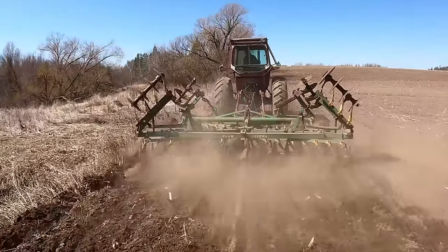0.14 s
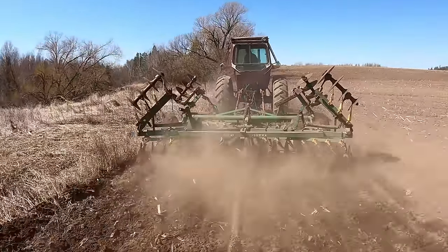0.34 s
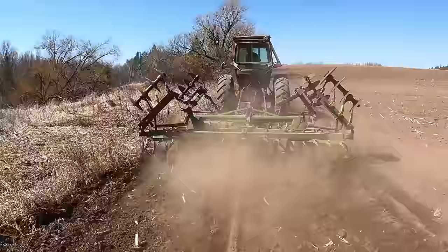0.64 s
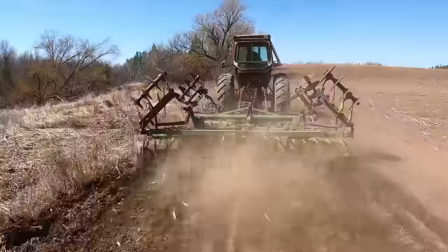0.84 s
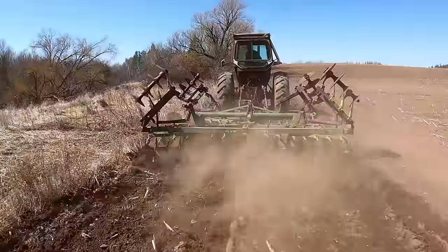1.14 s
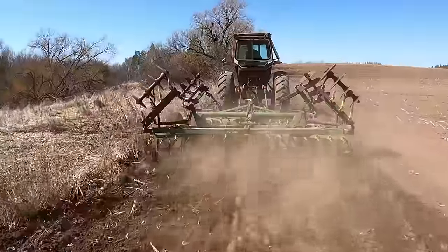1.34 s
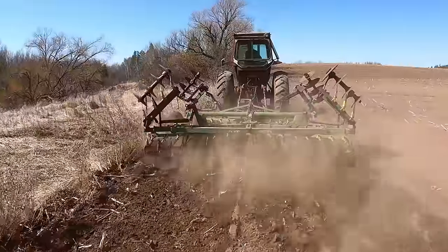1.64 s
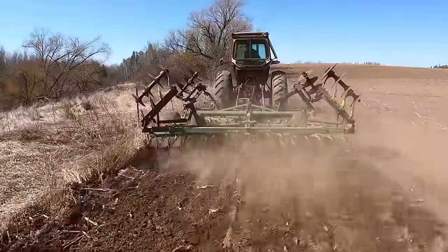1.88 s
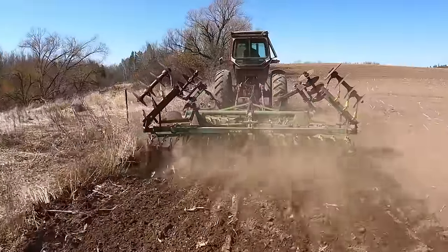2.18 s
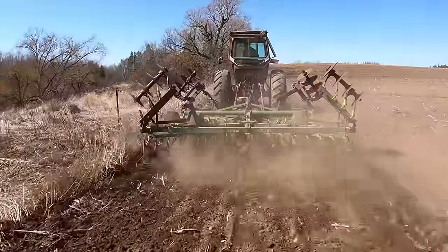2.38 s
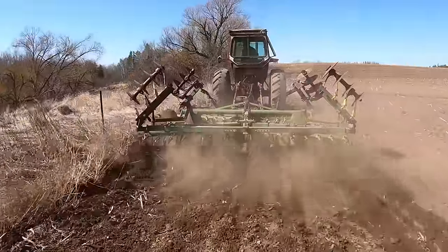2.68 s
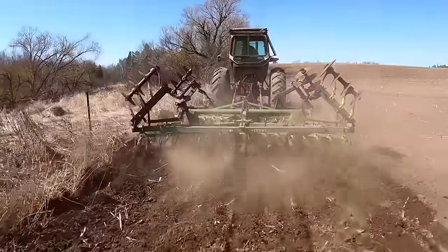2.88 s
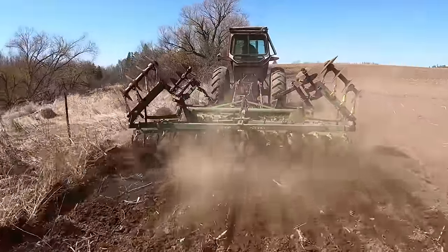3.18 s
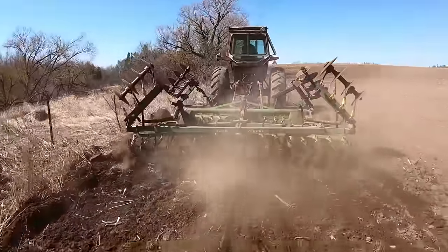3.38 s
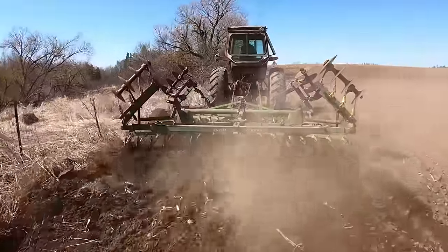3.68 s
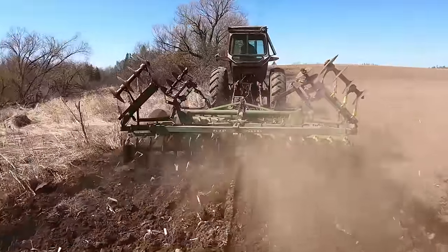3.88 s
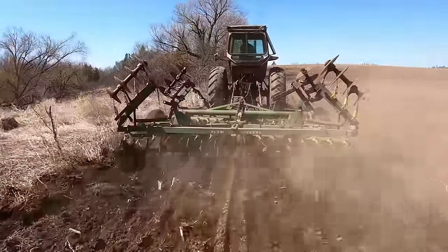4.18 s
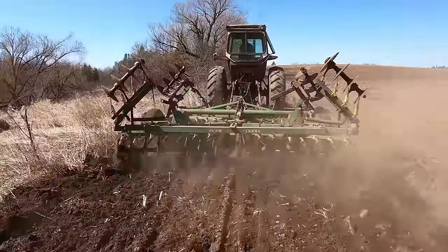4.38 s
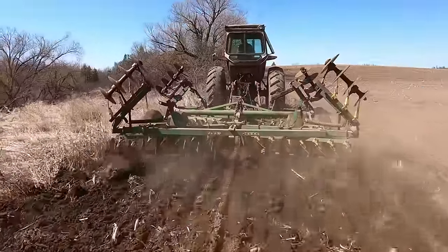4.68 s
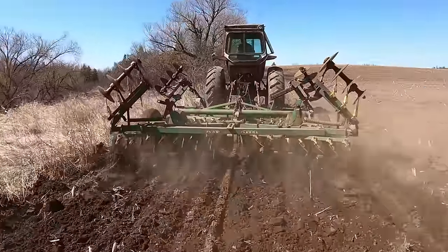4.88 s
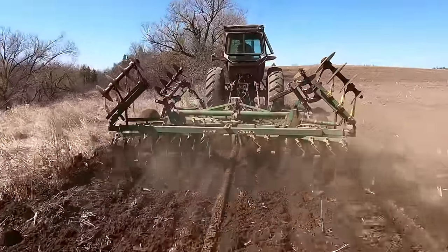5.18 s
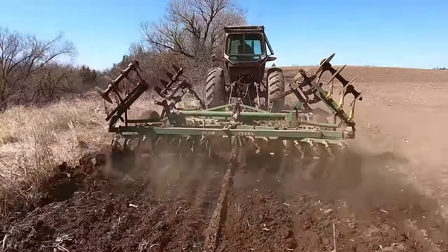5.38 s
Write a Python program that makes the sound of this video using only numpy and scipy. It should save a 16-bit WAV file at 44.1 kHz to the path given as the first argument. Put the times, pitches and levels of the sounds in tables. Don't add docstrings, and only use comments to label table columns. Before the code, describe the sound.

Continuous low engine boom and broad roar, heard in stereo from a vehicle trailing a tractor outdoors. Gritty soil crunch swells and falls in patches; dull knocks, bright stone pings and short rattling scrapes come irregularly. Squeaks cluster near half a second, two and a half and three and a half seconds. Clanks stop after about 3.6 seconds; late scrapes, sand spray and a short squeak end it as the harrow draws slightly away.

```python
import sys
import numpy as np
from scipy import signal
from scipy.fft import rfft, irfft, next_fast_len
from scipy.io import wavfile
from scipy.ndimage import uniform_filter1d

SR = 44100
rng = np.random.default_rng(int(sys.argv[2]) if len(sys.argv) > 2 else 0)


def log_audio(samples):
    frames = np.atleast_2d(samples).T
    limited = np.clip(frames, -1, 1)
    pcm = np.round(limited * 32767).astype(np.int16)
    wavfile.write(sys.argv[1], SR, pcm)


def voltage_ratio(level):
    return 10 ** (np.asarray(level, float) / 20)


N = 243873

# mode_hz, level_db, t60_s
DISC_MODES = [(575, 0.5, 0.035), (707, -8, 0.065), (981, -5, 0.18), (1200, -7, 0.017), (1452, -6.5, 0.069),
              (1600, -22, .06), (1753, -7, 0.19), (1930, -12, 0.72), (2060, -5.5, 0.12), (2350, -4.5, 0.03),
              (2490, -9.5, 0.12), (2870, -7, 0.11), (3180, -9.5, 0.04), (3450, -7, 0.056),
              (3600, -8.5, .08), (3910, -4, 0.072), (4020, -14, 0.063), (4350, -7.5, 0.12),
              (5150, -4, 0.066), (5450, -7, .08), (5840, -3, 0.083), (7000, 1, 0.052), (7530, -2.5, 0.071),
              (8800, -11, 0.093), (9900, -11, .1), (12064, -26, .1)]


def on_log(table, hz):
    f, v = np.transpose(table)
    return np.interp(np.log(np.maximum(hz, 1)), np.log(f), v)


def level(x, db):
    return x * voltage_ratio(db) / np.sqrt(np.mean(x ** 2))


def walk(rate_hz):
    k = int(SR / rate_hz)
    held = np.repeat(rng.standard_normal(N // k + 1), k)
    return 1.31 * uniform_filter1d(uniform_filter1d(held, k), k)[:N]


def colour(x, gain):
    m = next_fast_len(N)
    return irfft(rfft(x, m) * gain(np.arange(m // 2 + 1) * SR / m), m)[..., :N]


def bands(x, table, swell_db, flicker_db, rate_hz):
    swell = swell_db * walk(rate_hz / 3)
    out = 0
    for centre_hz in 30 * 2 ** np.arange(10):
        def band_gain(f):
            octaves = np.clip(np.log2((f + 1) / centre_hz), -1, 1)
            return voltage_ratio(on_log(table, f)) * np.cos(np.pi / 2 * octaves) ** 2
        out = out + colour(x, band_gain) * voltage_ratio(swell + flicker_db * walk(rate_hz))
    return out


def modes(hz, t60_s):
    t = np.arange(4096) / SR
    return np.exp(2j * np.pi * np.outer(hz, t) - np.log(1000) * t / np.reshape(t60_s, (-1, 1)))


def exhaust(turns, orders, wobble_turns, shimmer_db):
    wavering = turns + wobble_turns * walk(9.7)
    out = np.zeros(N)
    for order, db, sign in orders:
        out += sign * voltage_ratio(db + shimmer_db * walk(7.6)) * np.cos(2 * np.pi * order * wavering)
    return out


def tractor_exhaust(turns, t):
    # firing_multiple, level_re_boom_db, sign
    tractor_orders = [(4 / 6, -31, -1), (5 / 6, -23, -1), (1, 0, 1), (7 / 6, -23, -1), (1.797, -24, 1),
                      (2, -30, 1), (2.5, -32, 1), (17 / 6, -30, 1), (3, -22, 1), (4, -34, -1),
                      (4.29, -30, 1), (7.32, -35, 1), (9.32, -33, 1), (15.3, -34, 1)]
    boom_db, early_db, settle_s = -13, -1.5, 1.95
    return voltage_ratio(boom_db + early_db * np.exp(-(t / settle_s) ** 2)) * exhaust(turns, tractor_orders, .008, .4)


def quad_exhaust(turns):
    # harmonic, peak_db, sign
    quad_orders = [(2, -32, -1), (3, -38.5, 1), (4, -31, 1), (5, -27, 1), (6, -28, 1), (7, -27, 1),
                   (8, -30, 1), (9, -36, 1), (11, -49, 1), (12, -41, 1), (13, -48, 1), (15, -46, -1)]
    return voltage_ratio(.8) * exhaust(turns, quad_orders, .003, .6)


def roar(turns, quad_turns):
    # frequency_hz, density_db_per_hz
    roar_spectrum = [(12, -14), (30, -1), (50, -8), (100, -2), (130, -2), (160, -5.5), (220, -6.5),
                     (300, -5), (400, -11.5), (700, -10), (850, -13.5), (1400, -13), (2200, -19),
                     (4000, -33.5), (8000, -44), (13000, -63)]
    puff_db = 0.61 * np.cos(2 * np.pi * turns - 0.8) + 0.74 * np.cos(2 * np.pi * quad_turns)
    noise = bands(rng.standard_normal((2, N)), roar_spectrum, 1.0, 0.88, 9)
    return level(noise, -29.5) * voltage_ratio(puff_db)


def work(t):
    clods = [(0.0, 0.28, 4, 2), (.39, 0.034, 4.5, 3.5), (.54, 0.062, 8, 5.5), (.64, 0.82, 4, 1),
             (1.0, 0.054, -1, 1.5), (1.149, 0.14, 4, -1), (1.515, 0.023, 5, 1.5), (1.8, 0.088, 8, -6.5),
             (1.96, 0.64, 7, -2), (2.25, 0.078, 2.5, 5), (2.46, 0.074, 5, 5.5), (2.62, 0.4, 2.5, 1),
             (2.88, 0.11, 1.5, 3.5), (3.3, 0.068, 3, 0.5), (3.46, 0.065, 7.5, 0), (3.63, 0.19, 7, 1.5),
             (3.96, .05, 6, -7.5), (4.28, 0.1, 5, 1.5), (4.522, 0.45, 6.5, -1), (4.93, 0.092, 5.5, 0),
             (5.111, 0.11, 8.5, -2.5), (5.3, 0.18, 4.5, 1), (5.52, .05, 2.5, 7.5)]
    crunch_db, crunch_db_per_s, dust_db, attack_s = -35, -1.7, -14, 0.049
    start_s, release_s, crunch_rise_db, dust_rise_db = np.transpose(clods)
    u = t - start_s[:, None]
    swell = np.exp(-(u / np.where(u < 0, attack_s, release_s[:, None])) ** 2)
    return crunch_db + crunch_db_per_s * t + crunch_rise_db @ swell, dust_db + dust_rise_db @ swell


def soil(crunch_db, dust_db):
    # frequency_hz, density_db_per_hz
    soil_spectrum = [(500, -40), (1000, 2.5), (1600, -1), (3000, -2.5), (4000, -1.5), (5500, -7.5),
                     (7500, -12.5), (9000, -21), (12000, -28), (14000, -41)]
    burst_db = 0.89 * rng.exponential(size=N) + 0.6 * walk(45) + 1.64 * walk(150)
    grains = rng.standard_normal((2, N)) * voltage_ratio(burst_db)
    crunch = level(bands(grains, soil_spectrum, .01, 0.31, 24.96), 0)
    hz, _, t60_s = np.transpose(DISC_MODES)
    ring = modes(hz, t60_s).imag.sum(axis=0, keepdims=True)
    crunch = crunch + level(signal.fftconvolve(crunch, ring)[:, :N], -8)
    dust = colour(crunch, lambda f: np.clip(np.log2((f + 1) / 4500), 0, 1))
    return voltage_ratio(crunch_db - 2.5) * (crunch + dust * (voltage_ratio(dust_db + 14) - 1))


def blow_rows():
    # start_s, peak_db, low_ring_hz
    hub_knocks = [(0.015, -29, 1120), (0.0318, -12.5, 1550), (0.1984, -22, 1110), (0.2108, -19, 1970),
                  (0.5888, -14, 1313), (0.609, -13.5, 1930), (0.872, -14.5, 1390), (1.0888, -13, 2165),
                  (1.296, -20, 1430), (1.435, -18.5, 1500), (2.011, -19, 1590), (2.0751, -15, 2060),
                  (2.1105, -17, 1470), (2.206, -21, 1210), (2.44, -16, 1420), (2.627, -22, 1930),
                  (2.723, -16, 1400), (2.849, -18.5, 985), (3.108, -19, 1460), (3.1985, -19.5, 1106),
                  (3.463, -23.5, 1000), (3.6079, -22, 1010), (3.644, -17, 1220), (3.7796, -21, 990),
                  (3.7958, -16, 1980), (4.287, -18.5, 1190), (4.3063, -17, 1160), (4.4055, -17, 2210),
                  (4.6162, -19, 1550), (4.977, -18.5, 1930)]
    # start_s, peak_db, high_ring_hz, high_re_peak_db
    rim_pings = [(0.1077, -22, 2270, -9), (0.367, -21.5, 5150, 0.5), (.369, -24.5, 3920, -1),
                 (0.4136, -25.5, 2870, 3), (0.6574, -27, 6530, -8), (0.673, -22, 4280, -2.5),
                 (0.7445, -20, 2790, -8), (0.9282, -15.5, 2250, -7.5), (1.14, -29.5, 5000, 2.5),
                 (1.485, -22, 2540, -8.5), (1.7704, -20.5, 2620, -5), (1.8292, -24, 4060, -3),
                 (1.9335, -35, 2350, 8.5), (1.956, -26.5, 2410, 10), (2.2545, -21.5, 3910, -7),
                 (2.2713, -25, 2790, 2), (2.391, -30.5, 2900, 5), (2.4051, -27, 3950, 7.5),
                 (2.8296, -15.5, 2710, -12), (3.434, -23, 2590, -8), (3.566, -21, 3490, -4.5),
                 (3.6544, -16.5, 2730, -8), (3.6746, -14.5, 3710, -6.5), (3.69, -22, 3500, -5.5),
                 (3.946, -30, 4300, 1.5), (4.337, -25.5, 4520, 1)]
    # start_s, peak_db, low_ring_hz, high_ring_hz, high_re_peak_db
    disc_scrapes = [(0.306, -17.5, 1420, 2080, -2), (0.399, -11, 1600, 2490, -3.5),
                    (0.485, -15.5, 1780, 2210, -10), (0.492, -15.5, 1840, 2210, -13.5),
                    (.56, -16, 1420, 3780, -13), (0.496, -16, 1530, 3980, -12),
                    (0.5194, -21.5, 1450, 2240, -3), (0.5436, -17, 1860, 5700, -18),
                    (0.705, -19, 1500, 2740, -2.5), (1.1467, -11, 1730, 2350, -14.5),
                    (1.1644, -17, 1540, 2510, -18.5), (1.1784, -11.5, 1430, 3600, -31),
                    (1.195, -15.5, 1500, 2200, -18), (1.2244, -19.5, 1230, 2380, -12.5),
                    (1.2494, -18.5, 1190, 2080, -6.5), (1.2632, -17.5, 1680, 2350, -18),
                    (1.7842, -15.5, 1700, 2750, -11.5), (1.8041, -20, 2090, 2870, -12),
                    (1.947, -22, 2350, 3450, 5), (2.0532, -27, 2490, 3430, 1),
                    (3.262, -23, 1445, 3520, -11.5), (4.543, -11, 1180, 2440, -13.5),
                    (4.544, -15.5, 575, 1030, -7.5), (4.6559, -10.5, 1186, 2020, -10.5),
                    (4.66, -15, 1710, 2450, -10), (4.9257, -15, 1450, 2810, -27),
                    (5.1, -15, 1110, 3660, -13), (5.124, -22.5, 970, 3070, -10.5)]
    # start_s, peak_db, low_ring_hz, high_ring_hz, high_re_peak_db
    link_ticks = [
        (1.505, -21, 2200, 2570, -2),
        (4.243, -23, 1250, 3450, -2),
        (4.526, -21, 2060, 3180, -0.55),
    ]
    knock_ms, scrape_ms, tick_ms, dull_db = 7.3, 10.4, 2.3, -15
    hz = np.transpose(DISC_MODES)[0]
    high_choices = hz[(hz > 2200) & (hz < 4200)]
    low_choices = hz[(hz > 900) & (hz < 1700)]
    rows = []
    for s, db, low_hz in hub_knocks:
        rows.append((s, db, low_hz, rng.choice(high_choices), dull_db, knock_ms))
    for s, db, high_hz, high_db in rim_pings:
        rows.append((s, db, rng.choice(low_choices), high_hz, high_db, knock_ms))
    rows += [(*row, scrape_ms) for row in disc_scrapes]
    return rows + [(*row, tick_ms) for row in link_ticks]


def knocks():
    steel, crack = np.zeros(N + 8192), np.zeros((2, N + 8192))
    n = np.arange(4096)
    hz, mode_db, t60_s = np.transpose(DISC_MODES)
    body = modes(hz, t60_s)
    for s, db, low_hz, high_hz, high_db, ms in blow_rows():
        chance, turn = rng.standard_normal((2, len(hz)))
        noise = rng.standard_normal(4096)
        i = int(s * SR)
        fade = np.exp(-n / (np.clip(ms, 1, 25) * SR / 1000))
        rise = np.minimum(n / (7 * ms), 1)
        corners = np.log([500, low_hz, high_hz, 9000])
        part_db = np.interp(np.log(hz), corners, [-9, 0, high_db + 8.5, high_db - 16.0])
        gains = voltage_ratio(mode_db + part_db - 2.5 + 2.5 * chance) * np.exp(2j * np.pi * turn)
        rings = gains @ body
        rings += voltage_ratio(np.array([-1.5, high_db + 4.5])) @ modes([low_hz, high_hz], [.1, .1])
        steel[i:i + 4096] += voltage_ratio(db) * rings.imag * rise * fade ** 0.39
        crack[:, i:i + 4096] += voltage_ratio(db + np.array([[0], [high_db]])) * noise * rise * fade
    low_shape = [(300, -32), (700, -15.5), (1600, 2.0), (2600, -15.0), (5000, -46)]
    high_shape = [(1400, -42), (2500, 0), (4500, 7.5), (8000, -23.0), (13500, -47)]
    low = colour(crack[0, :N], lambda f: voltage_ratio(on_log(low_shape, f)))
    high = colour(crack[1, :N], lambda f: voltage_ratio(on_log(high_shape, f)))
    return voltage_ratio(-8.5) * steel[:N] + voltage_ratio(-3) * low + voltage_ratio(-8.5) * high


def clanks():
    # mode_hz, level_db, t60_s
    bar_modes = [(1450, 3, 0.15), (1720, -3.5, 0.091), (2080, -5.5, .1), (2490, -1, 0.1),
                 (2870, -2.5, 0.11), (3450, -3, 0.073), (4040, -8, 0.12), (4300, -18, 0.082),
                 (4800, -8, .1), (5500, -8, 0.12)]
    # start_s, peak_db, aim_hz
    bar_blows = [
        (.3053, -22, 2900),
        (.398, -21.5, 2500),
        (.705, -27, 2500),
        (1.0883, -28, 2900),
        (1.947, -30, 3400),
        (2.0532, -24.5, 3600),
        (3.259, -23.5, 2380),
        (3.566, -35.5, 3800),
    ]
    db_per_oct, rise_ms = 8, 1.5
    out = np.zeros(N + 4096)
    hz, mode_db, t60_s = np.transpose(bar_modes)
    body = modes(hz, t60_s) * np.minimum(np.arange(4096) / (rise_ms * SR / 1000), 1)
    for s, db, aim_hz in bar_blows:
        chance, turn = rng.standard_normal((2, len(hz)))
        gain_db = db + mode_db + 1.5 * chance - db_per_oct * np.abs(np.log2(hz / aim_hz))
        gains = voltage_ratio(gain_db) * np.exp(2j * np.pi * turn)
        i = int(s * SR)
        out[i:i + 4096] += (gains @ body).imag
    return out[:N]


def squeaks():
    # start_s, length_s, main_hz, level_db
    bearing_squeaks = [(.495, .02, 3950, -43), (.5, .025, 5690, -44), (.535, .025, 5690, -39),
                       (.57, .03, 5690, -41), (.522, .02, 8690, -50), (.522, .08, 9860, -55),
                       (.575, .035, 8250, -53), (.71, .035, 6680, -48), (.762, .015, 9860, -52),
                       (1.41, .02, 8500, -56), (2.153, .035, 5930, -42), (2.245, .07, 9915, -57),
                       (2.39, .1, 7190, -50), (2.4, .05, 9915, -54), (2.45, .05, 9915, -53),
                       (2.5, .06, 9915, -58), (2.405, .1, 3880, -48), (2.485, .03, 2400, -42),
                       (2.59, .11, 9860, -54), (2.61, .065, 3912, -40), (2.645, .015, 10600, -57),
                       (2.84, .04, 9860, -60), (2.92, .03, 4200, -50), (3.145, .02, 10100, -59),
                       (3.2, .02, 4700, -48), (3.57, .025, 5150, -48), (3.59, .075, 4260, -45),
                       (3.655, .045, 5690, -47), (3.675, .03, 9860, -52), (3.705, .06, 8690, -57),
                       (3.738, .025, 5690, -44), (3.765, .06, 6590, -52), (3.79, .035, 5800, -51),
                       (3.788, .03, 10400, -59), (4.48, .02, 10100, -61), (5.275, .02, 4260, -47),
                       (5.282, .022, 2000, -37), (5.3, .02, 8950, -59), (5.3, .02, 4480, -52),
                       (5.325, .012, 8515, -59), (5.335, .015, 3950, -45)]
    # main_hz, partner_hz, level_re_main_db
    partner_modes = [(9915, 12064, -4), (9915, 10550, -13), (9915, 14050, -17), (9860, 12064, -13),
                     (9860, 14050, -17), (5690, 6590, -7), (5930, 7100, -2), (5930, 8900, -5),
                     (3912, 1933, 4), (4260, 8515, -5)]
    out, t = np.zeros(N), np.arange(N) / SR
    chatter = voltage_ratio(3 * walk(90))
    waver = np.cumsum(walk(150)) / SR
    skirt = walk(900) + 1j * walk(900)
    songs = list(bearing_squeaks)
    for s, length_s, hz, db in bearing_squeaks:
        songs += [(s, length_s, f, db + rel_db) for main_hz, f, rel_db in partner_modes if main_hz == hz]
    for s, length_s, hz, db in songs:
        i = np.arange(int(s * SR), int((s + length_s + .04) * SR))
        u = t[i] - s
        own = (i + 7 * hz) % N
        swell = np.minimum(u / .004, 1) * np.exp(-.4 * u / length_s - np.maximum(u - length_s, 0) / .007)
        tone = np.exp(2j * np.pi * hz * (u + .002 * waver[i])) * (1 + .45 * skirt[own])
        out[i] += voltage_ratio(db + 4) * swell * chatter[own] * tone.real
    return out


def grit():
    # start_s, level_db
    sand_sprays = [ (.522, -33), (.657, -29), (1.14, -32), (1.505, -33), (1.77, -34), (1.83, -34),
                   (2.26, -33), (2.39, -33), (2.83, -34), (3.68, -31), (3.78, -32), (3.945, -33),
                   (3.96, -35), (5.105, -33), (5.128, -34)]
    out, n = np.zeros(N + 2048), np.arange(2048)
    envelope = np.minimum(n / 40, 1) * np.exp(-n / 250)
    for s, db in sand_sprays:
        i = int(s * SR)
        out[i:i + 2048] += voltage_ratio(db) * rng.standard_normal(2048) * envelope
    spray_shape = [(3000, -23), (6000, 6), (9000, -3), (12500, -13), (15000, -41)]
    return colour(out[:N], lambda f: voltage_ratio(on_log(spray_shape, f)))


def microphone_pair(direct, other):
    # frequency_hz, left_minus_right_db
    tilt = [(60, 0.87), (110, -0.058), (200, 0.0), (360, 0.0), (670, -1.8), (1220, -2), (2220, -1.4),
            (4050, -2), (7390, -0.5), (13500, 0.0)]
    # frequency_hz, left_lead_rad
    lead = [(100, 0.016), (500, -0.3), (1400, -0.12), (3000, -0.58), (6000, -0.22), (9500, -.1)]
    # frequency_hz, unrelated_share_db
    diffuse = [(30, 0), (80, -14), (250, -19), (600, -15.5), (1400, -15), (3000, -10.5), (6000, -10),
               (9000, -7), (11000, -11), (13000, -4)]

    def port(sign):
        def gain(f):
            phase = .5 * sign * on_log(lead, f) * (f > 100)
            return voltage_ratio(sign * on_log(tilt, f) / 2) * np.exp(1j * phase)
        return colour(direct, gain)

    side = colour(other, lambda f: voltage_ratio(on_log(diffuse, f)))
    return np.array([port(1) + side, port(-1) - side])


def scene():
    # time_s, tractor_firing_hz, quad_firing_hz
    speeds = [(0.0, 99.02, 16.2), (0.4, 98.39, 16.313), (0.79, 98.44, 16.691), (1.18, 98.61, 16.615),
              (1.58, 97.94, 16.809), (1.98, 97.74, 16.853), (2.37, 97.61, 16.649), (2.76, 98.07, 16.681),
              (3.16, 97.24, 16.997), (3.56, 97.25, 17.096), (3.95, 97.59, 16.797), (4.35, 96.85, 16.642),
              (4.74, 97.31, 16.654), (5.14, 97.57, 16.391), (5.53, 97.3, 16.55)]
    t = np.arange(N) / SR
    time_s, tractor_hz, quad_hz = np.transpose(speeds)
    turns = .166 + np.cumsum(np.interp(t, time_s, tractor_hz)) / SR
    quad_turns = .287 + np.cumsum(np.interp(t, time_s, quad_hz)) / SR
    tones = tractor_exhaust(turns, t) + quad_exhaust(quad_turns)
    direct, other = roar(turns, quad_turns) + soil(*work(t))
    steel = knocks() + clanks() + squeaks() + grit()
    smear = rng.standard_normal(2000) * np.exp(-np.arange(2000) / 400) * voltage_ratio(-26.0)
    scattered = signal.fftconvolve(steel, smear)[:N]
    return microphone_pair(direct + tones + steel, other + scattered)


def top_cut(x):
    return signal.sosfilt(signal.butter(12, 14090, fs=SR, output="sos"), x)


def record(dry):
    duck_ms, duck_share = 10, .26
    k = int(duck_ms * SR / 1000)
    power = uniform_filter1d(uniform_filter1d(np.mean(dry ** 2, axis=0), k), k)
    mean_power = np.mean(power)
    gain = (mean_power / (power + 0.43 * mean_power)) ** (duck_share / 2)
    return top_cut(dry * gain * voltage_ratio(0.84))


dry = scene()
out = record(dry)
log_audio(out)
```